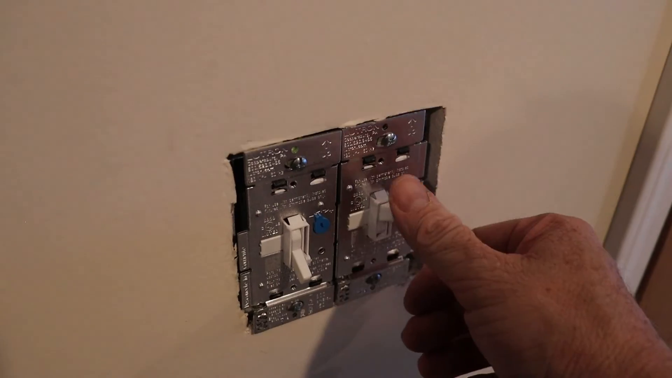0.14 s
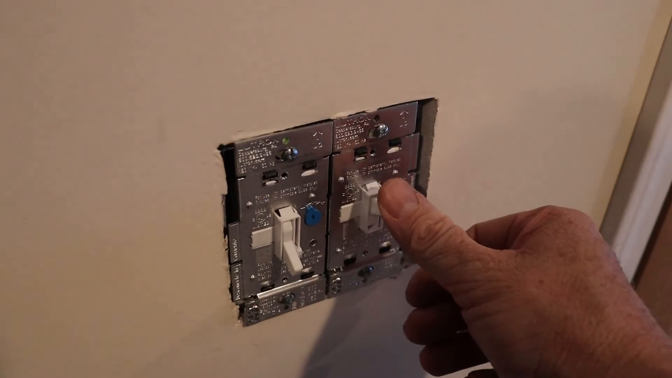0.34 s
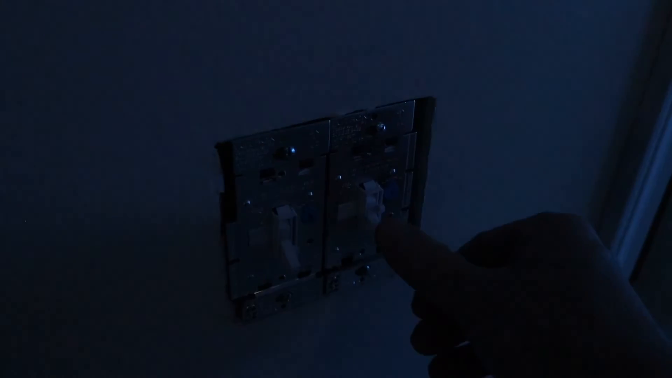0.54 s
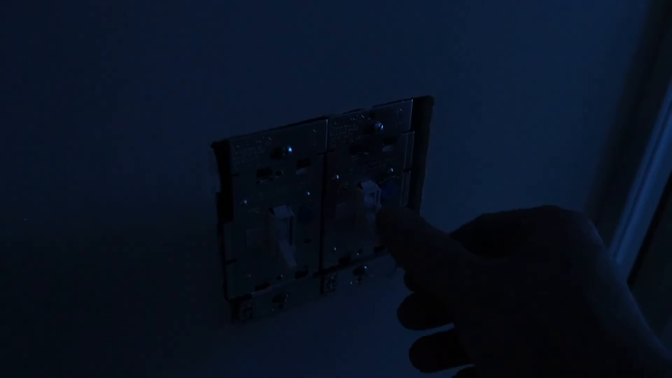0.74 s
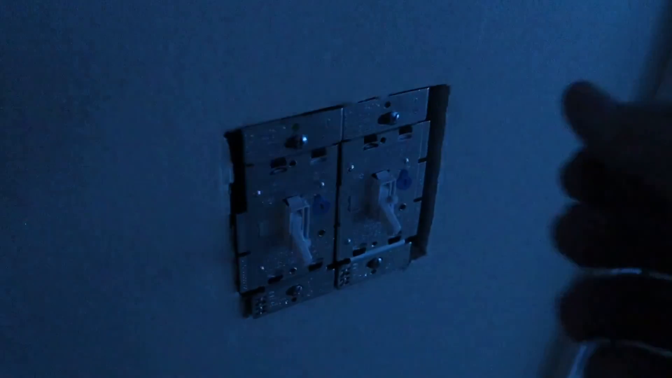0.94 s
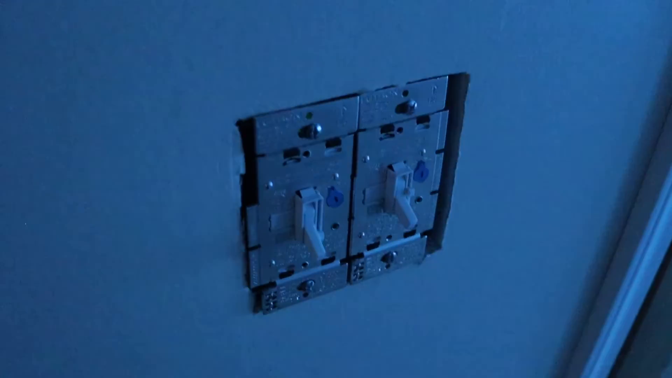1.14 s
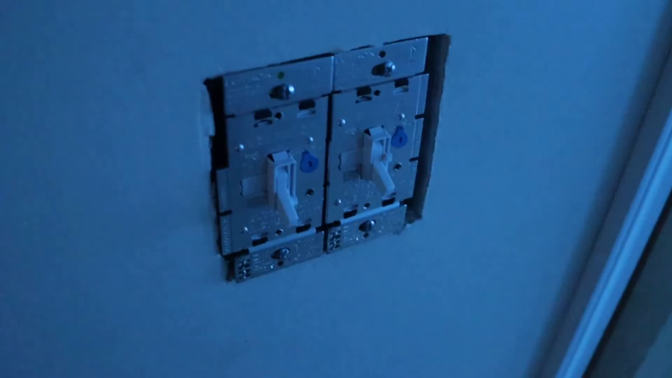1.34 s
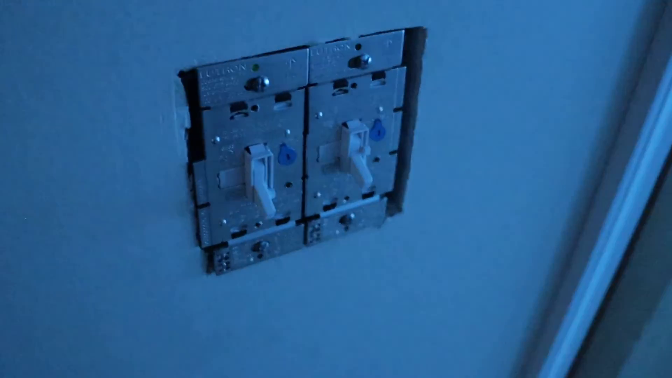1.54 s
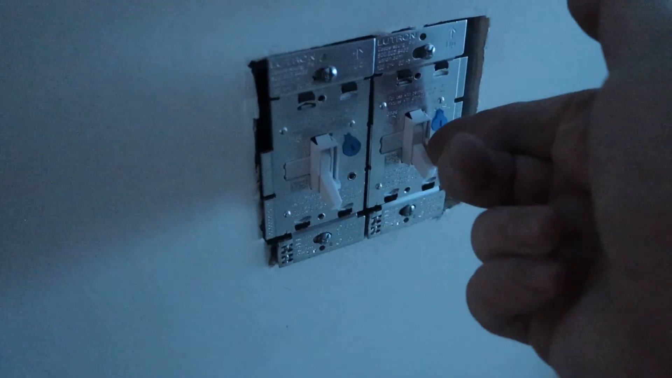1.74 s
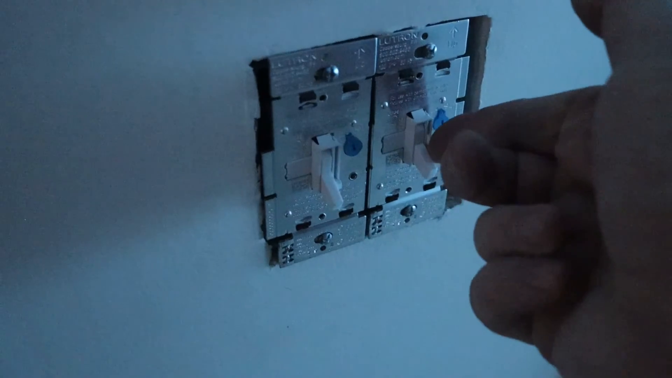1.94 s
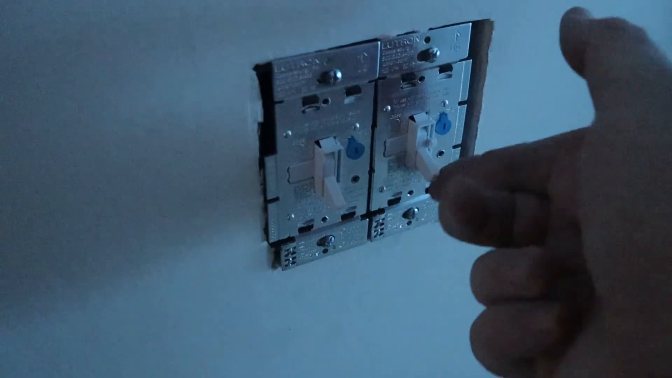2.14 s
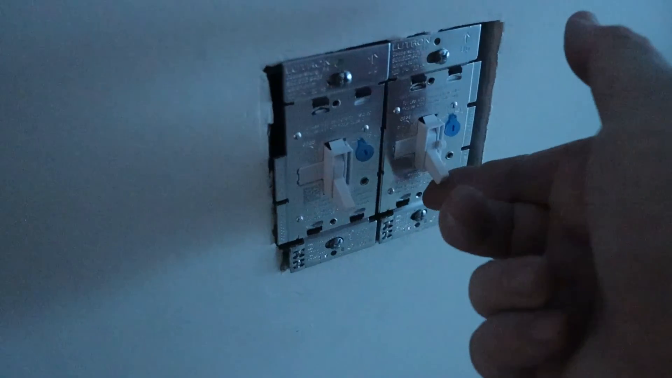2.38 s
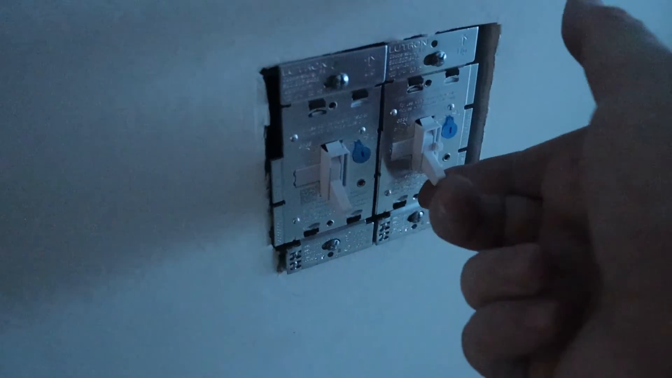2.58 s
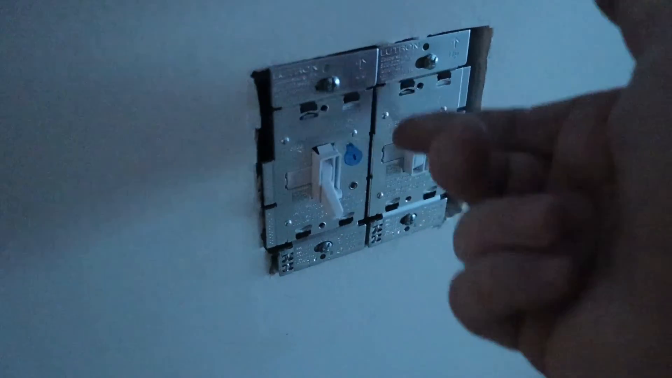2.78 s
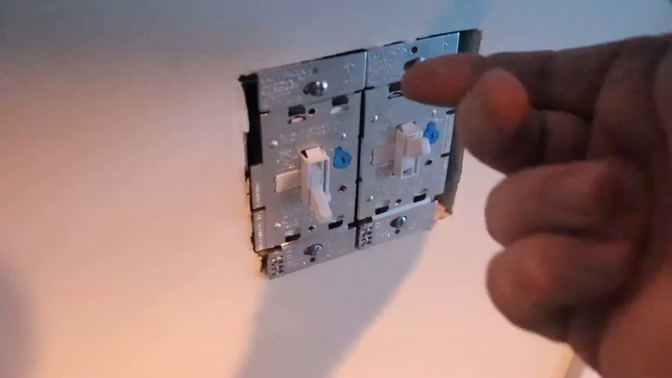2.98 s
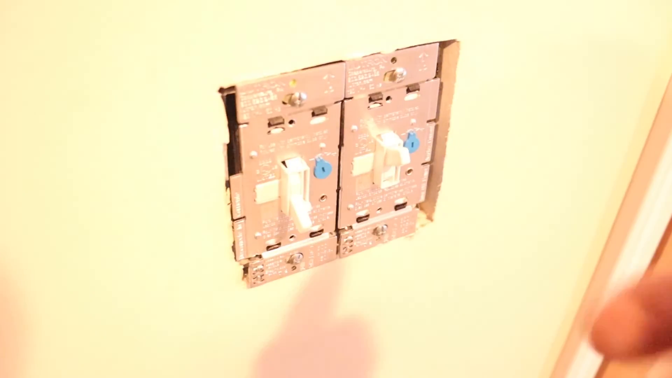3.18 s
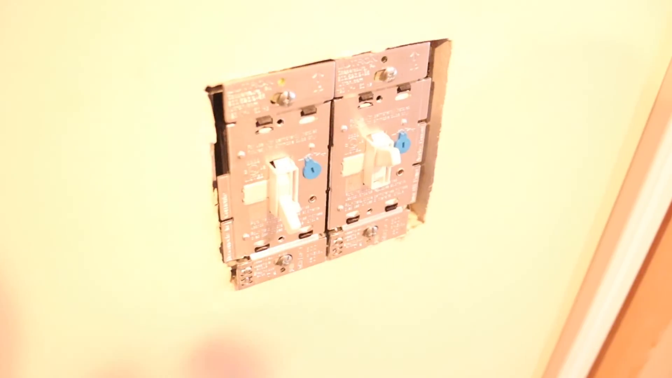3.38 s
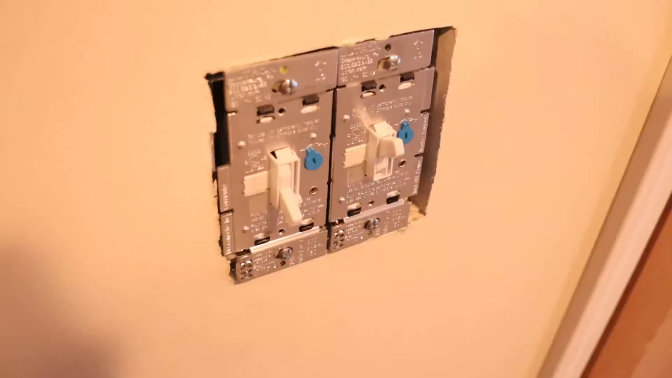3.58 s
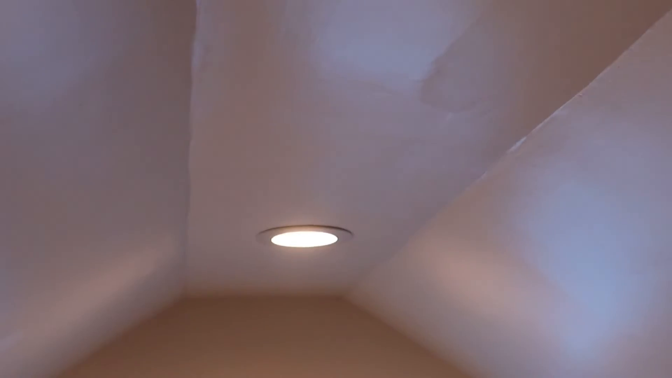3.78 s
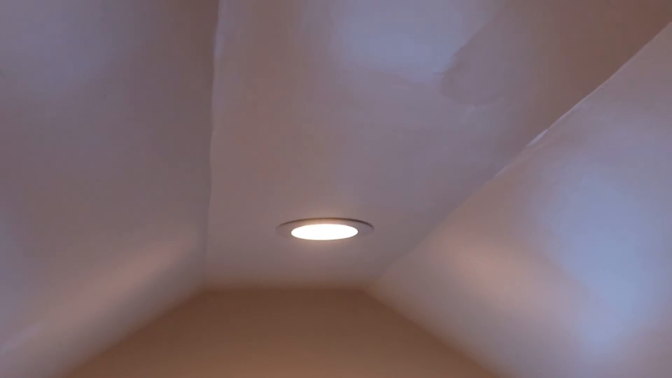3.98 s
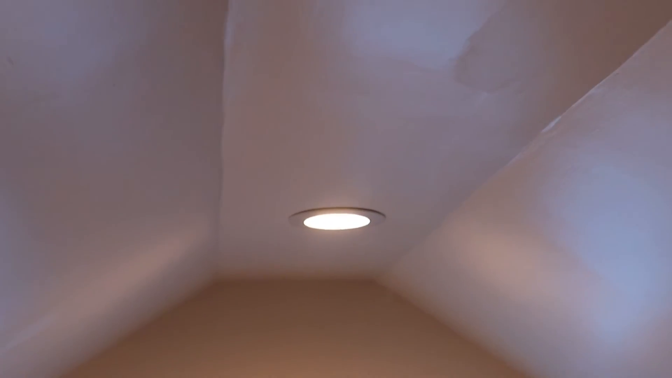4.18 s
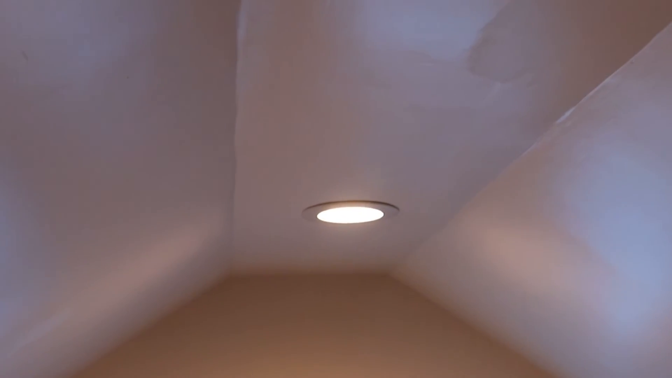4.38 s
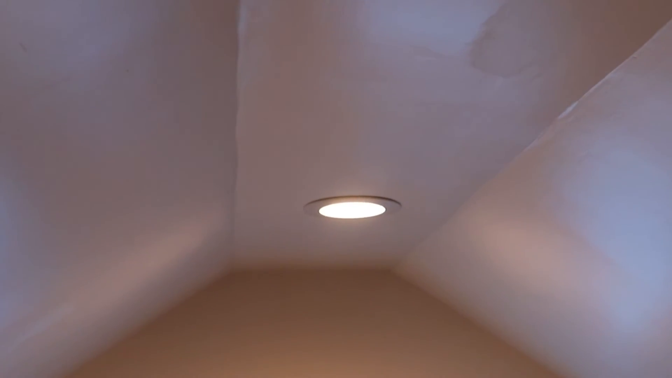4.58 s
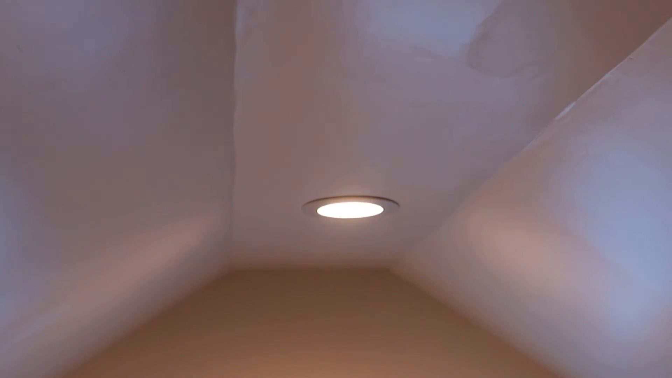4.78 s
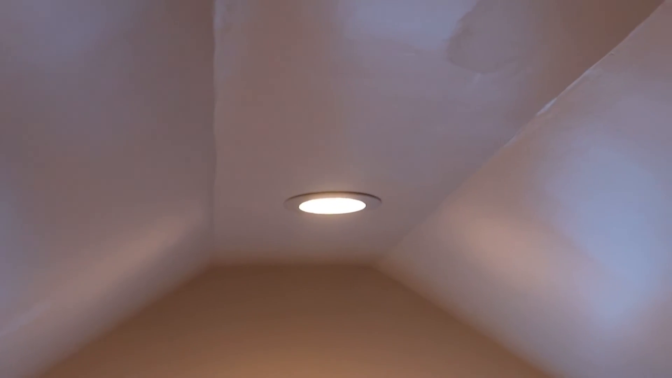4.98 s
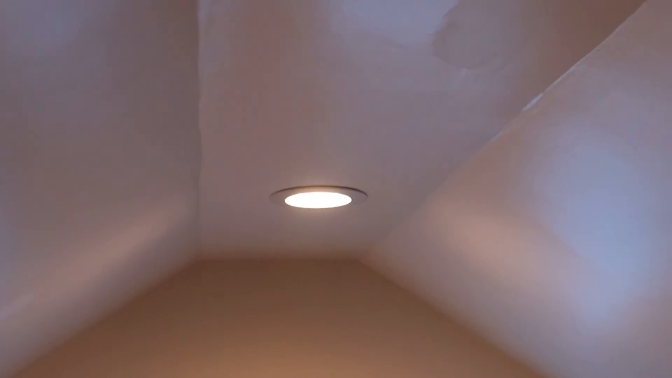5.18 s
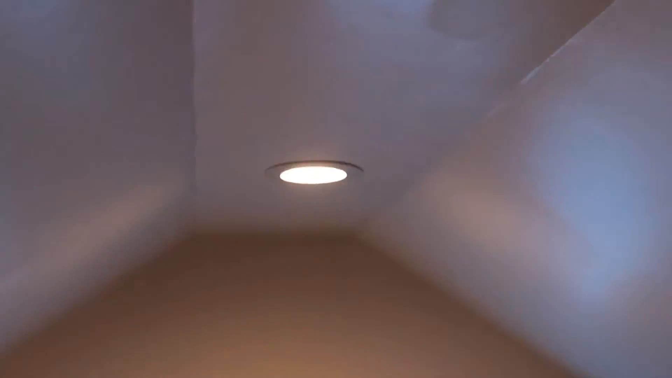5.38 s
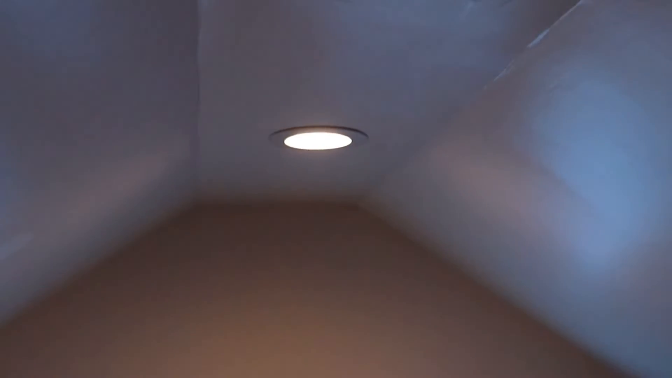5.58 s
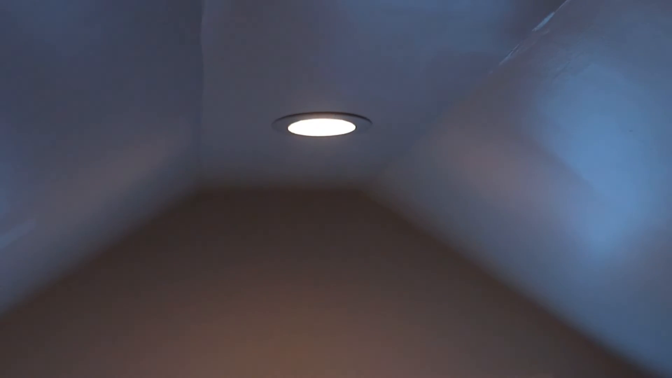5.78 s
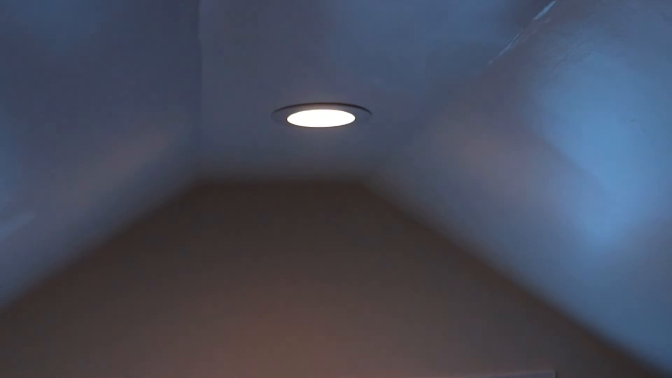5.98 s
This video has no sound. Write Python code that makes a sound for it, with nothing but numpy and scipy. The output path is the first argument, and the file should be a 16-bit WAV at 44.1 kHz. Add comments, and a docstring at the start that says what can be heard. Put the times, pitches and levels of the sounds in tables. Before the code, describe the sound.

Close up in a small quiet room, a thumb creaks over a loose wall switch in little dry slips, and the toggle snaps with a bright metallic click and a faint hollow wall thud. A finger brushes the recorder's case with a gritty, boomy scuff. Later the switch snaps again, louder and sharper, followed by another brief rub and sparse tiny handling ticks over soft hiss and low rumble.

```python
"""A creaking wall switch

A thumb creaks over a bare wall switch, which snaps off and later on again, in a small quiet room.
Tiny pushes make the switch and the hollow wall ring; the metal contacts add bright ticks of noise.
A finger rubs the camera's case twice, as gritty noise with a boom; small ticks are filtered puffs.
Hiss, hum, a low rumble and faint whines, made of noise and plain tones, fill the gaps."""
import sys
import numpy as np
from scipy import signal
from scipy.fft import rfft, irfft
from scipy.io import wavfile
from scipy.ndimage import uniform_filter1d

SR = 44100
rng = np.random.default_rng(int(sys.argv[2]) if len(sys.argv) > 2 else 0)


def log_audio(samples):
    """Write samples as a 16-bit WAV file to the path given in sys.argv[1]."""
    # one column per channel
    frames = np.atleast_2d(samples).T
    # limit to full scale, then quantise
    limited = np.clip(frames, -1, 1)
    pcm = np.round(limited * 32767).astype(np.int16)
    wavfile.write(sys.argv[1], SR, pcm)


N = 265790

# Colour of the background hiss. Each row: frequency in Hz, relative level in dB per Hz.
HISS_COLOUR = [(15, -61), (25, -29), (41, -7.5), (64, -6.5), (123, -8), (206, -9.5), (242, -5),
               (354, -16.5), (405, -18.5), (451, -15.5), (818, -14), (1100, -14), (10700, -26.5),
               (12500, -26), (16000, -26.5)]
HISS_DB = -58.5
# How alike left and right hiss are. Each row: frequency in Hz, likeness (1 same, 0 unrelated, below 0 opposed).
HISS_LIKENESS = [(60, 0.73), (180, 0.72), (550, 0.069), (1650, 0.052), (4970, 0.081), (15000, -0.28)]
# Mains hum. Each row: pitch in Hz, peak level in dB around which it wavers.
HUM_TONES = [(59.7, -67), (119.4, -71)]
# Swells and fades of the low rumble. Each row: time in seconds, level in dB.
RUMBLE_LEVELS = [(0.0, -68.5), (0.64, -65), (1.28, -75), (1.58, -63), (1.85, -74.5), (2.35, -60.5),
                 (3.36, -65.5), (3.66, -58), (4.1, -72), (4.53, -70.5), (5.24, -58.5), (5.69, -71),
                 (6.03, -68.5)]
RUMBLE_HZ, RUMBLE_WIDTH_HZ = 286, 377  # the width is that of each of two filter passes

# Ringing of plate, toggle and box.
# Each row: pitch in Hz, level in dB, time to fall by 60 dB in seconds, left minus right in dB.
SWITCH_MODES = [(683, -20, 0.04, 5), (880, -5, 0.016, 0), (1037, -7, 0.025, -1), (1500, -20, 0.037, 6),
                (1804, -13.5, 0.055, -4.5), (2020, -8, 0.019, -8), (2260, -9, 0.032, -1.5),
                (2535, -0.5, 0.011, -9), (2820, -3.5, 0.0087, -4), (3220, -2, 0.01, -6),
                (3600, -12, .012, -3), (3760, -12, 0.022, 9), (4480, -10.5, .01, -14),
                (4710, -17, 0.0228, 10.5), (5720, -1.5, 0.009, -1), (6160, -20.5, 0.0174, 11)]
# Ringing of the hollow wall panel. Each row: pitch in Hz, level in dB, time to fall by 60 dB in seconds.
WALL_MODES = [(106, -9.5, 0.148), (123.6, 1, 0.25), (177.5, -6, .12), (241, -3, 0.078), (308, 1, 0.051),
              (386, -5, 0.14), (474, -28, 0.067)]
# Colour of metal contact noise. Each row: frequency in Hz, boost in dB per Hz.
TICK_COLOUR = [(3000, 7.5), (4500, 10.5), (5600, 12.5), (6400, 3.5), (8500, 3), (10000, 3), (11900, 4),
               (14100, 6.5), (16000, 2)]
# Stereo balance of that noise. Each row: frequency in Hz, left minus right in dB.
TICK_BALANCE = [(2500, 0.5), (4500, -2), (8000, -9), (15000, -15)]
# Soft hisses on the switch; the 2.857 row is a short rising hiss before the second snap.
# Each row: start in seconds, length in seconds, push that rings the switch in dB,
# hiss before colouring in dB, share of the length spent swelling (kept within .02 to .98).
SOFT_HISSES = [(0.139, .025, -80, -72, 0.34), (0.275, 0.043, -64, -66, 0.078),
               (0.583, 0.087, -72, -61.5, 0.89), (1.987, 0.034, -73, -78, .4),
               (2.156, 0.037, -73, -74, 0.36), (2.813, 0.066, -65, -61, 0.6),
               (2.857, 0.0111, -65, -49.5, 1)]
SOFT_HISS_MS = 0.17  # softness of the push
# The thumb creaks over the lever in soft slips.
# Each row: time in seconds, ring push in dB, contact time in ms, wall thud push in dB.
SLIPS = [(.364, -30.5, .4, -53), (0.4125, -24, .39, -48), (0.4224, -29, .38, -60), (.431, -23, 0.39, -49),
         (.44, -20.5, 0.51, -58), (.473, -25.5, .37, -57), (.487, -23, 0.51, -50), (0.504, -35, 0.37, -58),
         (0.522, -29.5, .24, -48.5)]
# The spring lets go, the metal contacts meet, the lever hits its stop. Ticks are levels before colouring.
# Each row: let-go in seconds, its ring push in dB, its tick in dB, contacts meeting in seconds, ring push in dB,
# tick in dB, stop in seconds, ring push in dB, tick in dB, wall thud push in dB.
SNAPS = [(.648, -23.5, -62, .656, -46, -23.5, .6578, -17.5, -36, -32.5),
         (2.849, -32, -45, 2.8682, -32, -21.5, 2.8721, -9, -18, -29)]
# Bounces off the stop, one list for each snap. Each row: delay after the stop in ms, ring push in dB.
BOUNCES = [
    [(2.3, -21), (5.7, -27)],
    [(1.1, -14.5), (3.6, -15.5), (4.9, -21)],
]
LET_GO_MS, MEET_MS, STOP_MS = 0.24, .06, 0.075  # contact times
SOFTER_MS_PER_MS = .018  # later bounces touch for longer, so they land softer
LET_GO_THUD_DB, BOUNCE_TICK_DB, BOUNCE_THUD_DB = -21.5, -14.5, -37  # against the ring push
SILENT_DB = -120

# Small ticks of handling, and soft 2 kHz rings of the brushed switch (.142 and .276, near 2 kHz).
# Each row: start in seconds, peak level in dB, pitch in Hz,
# width in Hz (each of two filter passes is 1.36 times as wide),
# length in ms (the noise peaks after a third of it), left minus right in dB.
SMALL_TICKS = [(.142, -52.5, 2040, 352, 13, -2), (.276, -52, 1930, 200, 32, -2),
               (0.276, -50.5, 7500, 1510, 20, -7), (.301, -53, 4000, 3000, 3, -2),
               (2.811, -44, 3500, 3000, 2.7, -3), (3.390, -48, 1000, 500, 2.3, -1),
               (3.758, -45, 148, 60, 8.9, 1), (3.761, -50, 2900, 895, 4.6, 6),
               (4.075, -54.5, 4300, 1500, 3.4, -10), (4.564, -50, 2100, 1200, 5.1, 10),
               (4.58, -57, 950, 300, 8, 0), (4.642, -54, 1100, 1200, 5, 0),
               (4.718, -44, 1500, 2500, 5.4, 3), (4.735, -52, 950, 250, 8, -2),
               (4.729, -53, 130, 40, 18, 0), (4.917, -54, 696, 500, 4.7, -3),
               (5.05, -48, 1000, 800, 6, -13), (5.05, -50.5, 5960, 5000, 4.4, -12),
               (5.575, -47, 935, 496, 2.8, -15), (5.629, -53.5, 1290, 600, 6.8, -17),
               (5.629, -47.5, 4470, 5000, 6.6, -16)]
# Room echo dying away. Each row: frequency in Hz, time to fall by 60 dB in seconds.
ROOM_DECAY = [(150, 0.38), (800, 0.18), (2500, 0.17), (6000, 0.23), (14000, 0.18)]
# Colour of the room echo. Each row: frequency in Hz, relative level in dB.
ROOM_COLOUR = [(150, -2.5), (400, 5.5), (1000, 8), (3000, 2), (6000, 1), (14000, -1)]
ROOM_DB = -13.5

# The finger lands on the case before it rubs. Each row: start in seconds, hiss level at its peak in dB.
TOUCHES = [(1.397, -55.5), (1.433, -56)]
TOUCH_RISE_S, TOUCH_S, TOUCH_START_DB, TOUCH_FADE_DB = .004, .03, -4, -12
TOUCH_BOOM_DB, TOUCH_TOP_DB = 1, -13  # against the hiss
TOUCH_LINGER_DB = 9  # boom and top treble fade this much less
# Skin rubbing the case, one list for each stroke.
# Each row: time in seconds, hiss in dB, body boom against the hiss in dB, top treble against the hiss in dB.
STROKES = [
    [(1.468, -55.5, -6, -1), (1.505, -46.5, 0, -8), (1.586, -50, -7.5, -5), (1.622, -43, -11, -8),
     (1.671, -48, -5.5, -3)],
    [(3.654, -55.5, -13, -14), (3.688, -48.5, -3, -9), (3.696, -48.5, -1.5, 1), (3.729, -44, -2.5, -1.5),
     (3.741, -50.5, -1, 1)],
]
# Colour of skin on the case. Each row: frequency in Hz, relative level in dB per Hz.
SKIN_COLOUR = [(650, -19.5), (1100, -4), (1720, -0.5), (2580, -4), (2850, -11.5), (3190, -5), (3610, -9),
               (4510, -6.5), (7390, -17.5), (14800, -17), (16000, -16.5)]
# Boom of the case. Each row: pitch in Hz, width in Hz (each of two filter passes is 1.24 times as wide),
# level in dB.
CASE_MODES = [(217.7, 23, 5), (314, 40, -2), (427, 38, 2.5), (680, 214, 1), (878, 220, 0.5)]
# Stereo balance of the rubbing. Each row: frequency in Hz, left minus right in dB.
RUB_BALANCE = [(60, -6), (180, -19), (550, -9), (1650, -5), (4970, -15.5), (15000, -14)]
# Faint electronic whines. Each row: start in seconds (a negative one counts back from the end), pitch in Hz,
# level in dB, width in Hz of each of two filter passes.
WHINES = [(4, 12500, -81, 600), (-2.5, 14900, -90, 200)]
EDGE_HZ = 15900  # highest frequency kept in the sound


def gain_of(db):
    """Turns decibels into a gain."""
    return 10 ** (np.asarray(db) / 20)


def evened(x):
    """Scales a sound to an rms level of 1."""
    return x / np.sqrt(np.mean(x ** 2) + 1e-20)


def read(points, hz):
    """Reads a frequency table between its points, on a log-frequency axis."""
    f, value = np.transpose(points)
    return np.interp(np.log(hz + 1), np.log(f + 1), value)


def add(mix, s, sound):
    """Mixes a sound in at time s; a negative s counts back from the end."""
    part = mix[..., round(s * SR):][..., :sound.shape[-1]]
    part += sound[..., :part.shape[-1]]


def coloured(x, points, factor=1):
    """Makes each frequency louder or softer by a dB table."""
    hz = np.fft.rfftfreq(x.shape[-1], 1 / SR)
    return irfft(rfft(x) * gain_of(factor * read(points, hz)), x.shape[-1])


def panned(x, points):
    """Splits a sound into left and right by a balance table, half the difference to each side."""
    return np.array([coloured(x[0], points, .5), coloured(x[-1], points, -.5)])


def resonate(x, hz, width):
    """Passes a sound twice through a two-pole resonance, each of about gain 1 at its peak."""
    pole = np.exp((2j * np.pi * hz - np.pi * width) / SR)
    for _ in range(2):
        x = 2 * signal.lfilter([1 - abs(pole)], [1, -pole], x).real
    return x


def highpass(x, order, hz):
    """Removes the sound below a frequency."""
    return signal.sosfilt(signal.butter(order, hz, "high", fs=SR, output="sos"), x)


def patchy(count, patchy_db, bins, frames):
    """Makes two random short-time spectra whose shared level drifts in patches of time and frequency."""
    a, b, c, d, patches = rng.standard_normal((N // (count // 4) + 5, count // 2 + 1, 5)).T
    patches = uniform_filter1d(patches, size=bins, axis=0)
    patches = evened(uniform_filter1d(patches, size=frames, axis=1))
    return np.array([a + 1j * b, c + 1j * d]) * gain_of(patchy_db * patches)


def microphone_hiss():
    """Coloured noise at each port, more alike in the bass than higher up."""
    hz = np.fft.rfftfreq(1024, 1 / SR)
    patchy_db = read([(300, 1.7), (3000, 1.06)], hz)[:, None]
    left, other = patchy(count=1024, patchy_db=patchy_db, bins=8, frames=20)
    same = np.clip(read(HISS_LIKENESS, hz), -1, 1)[:, None]
    right = same * left + np.sqrt(1 - same ** 2) * other
    spectra = np.array([left, right]) * gain_of(read(HISS_COLOUR, hz)[:, None])
    hiss = signal.istft(spectra, nperseg=1024, noverlap=768)[1][:, :N]
    return gain_of(HISS_DB) * evened(hiss)


def mains_hum():
    """Steady sine tones whose level wavers slowly."""
    waver = evened(uniform_filter1d(rng.standard_normal(N), 6000))
    hum = np.zeros(N)
    for hz, db in HUM_TONES:
        cycles = hz * np.arange(N) / SR + rng.random()
        hum += gain_of(db + 1.5 * waver) * np.sin(2 * np.pi * cycles)
    return hum


def rumble():
    """Low noise from far off: resonated noise, partly alike at both ports."""
    s, db = np.transpose(RUMBLE_LEVELS)
    a, b = (resonate(x, RUMBLE_HZ, RUMBLE_WIDTH_HZ) for x in rng.standard_normal((2, N)))
    both = evened(np.array([a + 0.64 * b, b + 0.23 * a]))
    return gain_of(np.interp(np.arange(N) / SR, s, db)) * both


def ring(hz, db, t60):
    """One way an object rings: a sine that dies away by 60 dB in t60 seconds."""
    t = np.arange(SR // 2) / SR
    return gain_of(db - 60 * t / t60) * np.sin(2 * np.pi * hz * t)


def contact(ms):
    """A bell-shaped force of area 1, centred at half a millisecond; softer ones excite fewer high modes."""
    t_ms = np.arange(60) / SR * 1000
    force = np.exp(-.5 * ((t_ms - .5) / max(ms / 2, .01)) ** 2)
    return force / force.sum()


def slips():
    """Thumb slips as blows without a metal tick: (s, ring dB, contact ms, tick dB, thud dB)."""
    return [(s, db, ms, SILENT_DB, thud_db) for s, db, ms, thud_db in SLIPS]


def snaps():
    """Spring let-go, contacts, stop and bounces, as blows in the same form as the slips."""
    blows = []
    for snap, bounces in zip(SNAPS, BOUNCES):
        go_s, go_db, go_tick_db, meet_s, meet_db, meet_tick_db, stop_s, stop_db, stop_tick_db, thud_db = snap
        blows.append((go_s, go_db, LET_GO_MS, go_tick_db, go_db + LET_GO_THUD_DB))
        blows.append((meet_s, meet_db, MEET_MS, meet_tick_db, SILENT_DB))
        blows.append((stop_s, stop_db, STOP_MS, stop_tick_db, thud_db))
        for ms, db in bounces:
            contact_ms = STOP_MS + SOFTER_MS_PER_MS * ms
            blows.append((stop_s + ms / 1000, db, contact_ms, db + BOUNCE_TICK_DB, db + BOUNCE_THUD_DB))
    return blows


def switch():
    """Blows and soft hisses make the plate ring, blows also the wall; both add bright noise."""
    push, thud, ticks = np.zeros((3, N))
    for s, length, db, hiss_db, swell in SOFT_HISSES:
        progress = np.arange(0, 1, 1 / (length * SR))
        shape = np.interp(progress, [0, np.clip(swell, .02, .98), 1], [0, 1, 0])
        grain = rng.standard_normal((2, len(shape))) * shape
        add(push, s, gain_of(db) * np.convolve(grain[0], contact(SOFT_HISS_MS)))
        add(ticks, s, gain_of(hiss_db) * grain[1])
    t = np.arange(400) / SR
    tick_shape = np.minimum(t / 0.00025, 1) * gain_of(-60 * t / 0.0093)
    for s, db, contact_ms, tick_db, thud_db in slips() + snaps():
        add(push, s - .0005, gain_of(db) * contact(contact_ms))  # the force peaks at s
        add(thud, s, gain_of(thud_db) * np.hanning(130) / 65)
        add(ticks, s, gain_of(tick_db) * tick_shape * rng.standard_normal(len(t)))
    # neighbouring modes start in opposite directions, so each ring swells for a moment before it dies
    plate, wall = np.zeros((2, SR // 2)), np.zeros(SR // 2)
    for k, (hz, db, t60, pan_db) in enumerate(SWITCH_MODES):
        plate += (-1) ** k * gain_of([[pan_db / 2], [-pan_db / 2]]) * ring(hz, db, t60)
    for k, (hz, db, t60) in enumerate(WALL_MODES):
        wall += (-1) ** k * ring(hz, db, t60)
    ringing = highpass(signal.oaconvolve(push[None], plate, axes=1)[:, :N], 2, 620)
    boom = highpass(signal.oaconvolve(thud, wall)[:N], 2, 95)
    return ringing + boom + panned(coloured(ticks, TICK_COLOUR)[None], TICK_BALANCE)


def small_ticks():
    """Handling ticks and soft switch rings: puffs of noise, each through its own resonance."""
    out, t = np.zeros((2, N)), np.arange(3000) / SR
    for s, db, hz, width, ms, pan_db in SMALL_TICKS:
        u = t * 3000 / ms
        noise = rng.standard_normal(len(t)) * u * np.exp(-u)
        puff = resonate(noise, hz, 1.36 * width)
        add(out, s, gain_of([[db + pan_db / 2], [db - pan_db / 2]]) * puff / abs(puff).max())
    return out


def room(x):
    """Room echo: sparse clicks of random sign, each frequency band dying at its own speed."""
    taps = np.zeros((2, SR // 2))
    starts = np.arange(round(.005 * SR), SR // 2 - 20, 10)
    places = starts + rng.integers(0, 10, (2, len(starts)))
    np.put_along_axis(taps, places, rng.choice([-1., 1.], places.shape), 1)
    taps = taps + 0.25 * taps[::-1]  # each side shares a little with the other
    hz, t, z = signal.stft(taps, SR, nperseg=256)
    level_db = read(ROOM_COLOUR, hz)[:, None] - 60 * t / read(ROOM_DECAY, hz)[:, None]
    tail = signal.istft(z * gain_of(level_db), SR, nperseg=256)[1]
    return signal.fftconvolve(x.mean(0)[None], tail / np.linalg.norm(tail[0]), axes=1)[:, :N]


def touch(s, db):
    """A landing finger as a short stroke: quick rise, then a fade."""
    return [(s, db + TOUCH_START_DB, TOUCH_BOOM_DB, TOUCH_TOP_DB),
            (s + TOUCH_RISE_S, db, TOUCH_BOOM_DB, TOUCH_TOP_DB),
            (s + TOUCH_S, db + TOUCH_FADE_DB, TOUCH_BOOM_DB + TOUCH_LINGER_DB, TOUCH_TOP_DB + TOUCH_LINGER_DB)]


def rubs():
    """Gritty skin friction next to the right port: hiss, its top treble, and the boom of the case."""
    # the contact patch keeps changing, so bands of the hiss come and go
    spectra = patchy(count=256, patchy_db=3, bins=6, frames=18)
    right, other = signal.istft(spectra, nperseg=256, noverlap=192)[1][:, :N]
    left = 0.4 * np.roll(right, round(0.00024 * SR)) + 0.73 * other  # the left port hears it later
    flutter_db = 0.76 * evened(uniform_filter1d(rng.standard_normal(N), 40))
    grit = np.array([left, right]) * gain_of(flutter_db)
    hiss = coloured(grit, SKIN_COLOUR)
    low = signal.sosfiltfilt(signal.butter(4, 8000, fs=SR, output="sos"), hiss)
    boom = np.zeros((2, N))
    for k, (hz, width, db) in enumerate(CASE_MODES):
        boom += (-1) ** k * gain_of(db) * resonate(grit, hz, 1.24 * width)
    boom = boom + 0.2 * boom[::-1]  # the case moves both ports alike
    layers = [evened(x) for x in (low, boom, hiss - low)]
    out = np.zeros((2, N))
    for rows in [touch(*row) for row in TOUCHES] + STROKES:
        s, db, boom_db, top_db = np.transpose(rows)
        t = np.arange(s[0], s[-1], 1 / SR)
        at = round(s[0] * SR)
        edge = np.clip(np.minimum(t - s[0], s[-1] - t) / 0.0014, 0, 1)  # soft start and end
        for layer, against_db in zip(layers, (0, boom_db, top_db)):
            level = gain_of(np.interp(t, s, db + against_db))
            add(out, s[0], edge * level * layer[:, at:at + len(t)])
    return panned(out, RUB_BALANCE)


def whines():
    """Faint electronic whines: noise squeezed into narrow bands, each lasting to the end."""
    out = np.zeros((2, N))
    for s, hz, db, width in WHINES:
        add(out, s, gain_of(db) * evened(resonate(rng.standard_normal(N), hz, width)))
    return out


def scene():
    """The switch and the small ticks echo in the room; all other sounds are added without echo."""
    near = switch() + small_ticks()
    background = microphone_hiss() + mains_hum() + rumble() + whines()
    return near + gain_of(ROOM_DB) * room(near) + rubs() + background


def record(dry):
    """The deep bass is cut, then everything above EDGE_HZ."""
    cut = highpass(dry, 5, 48)
    band = signal.firwin(511, EDGE_HZ, window=("kaiser", 9), fs=SR)
    return signal.oaconvolve(cut, band[None], "same")


dry = scene()
out = record(dry)
log_audio(out)
```